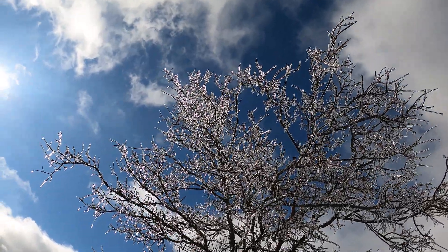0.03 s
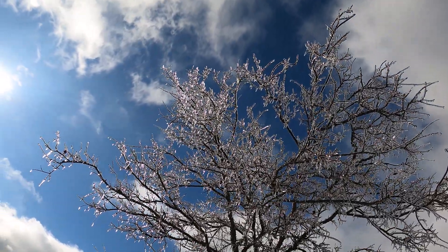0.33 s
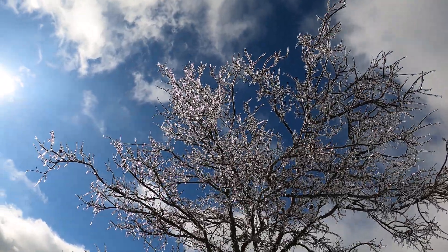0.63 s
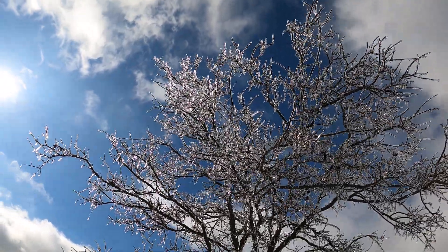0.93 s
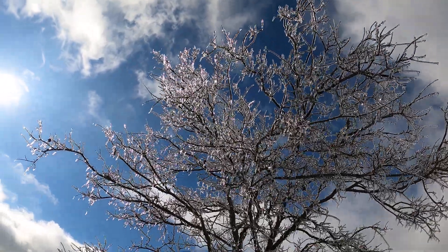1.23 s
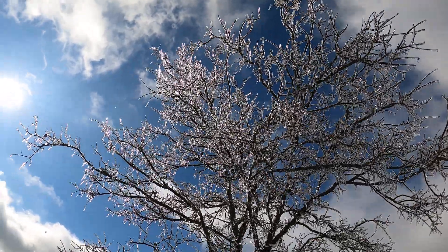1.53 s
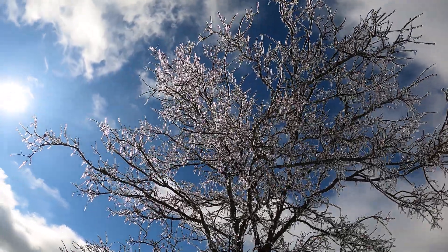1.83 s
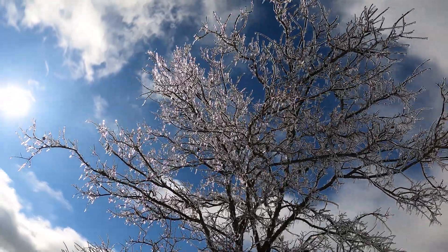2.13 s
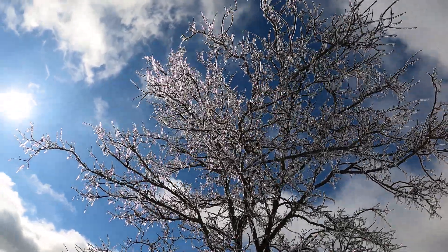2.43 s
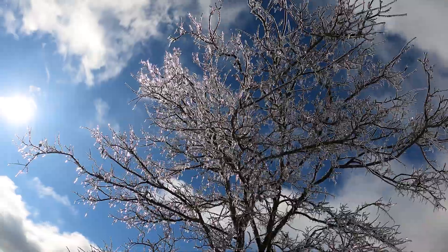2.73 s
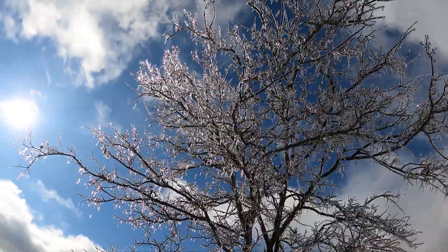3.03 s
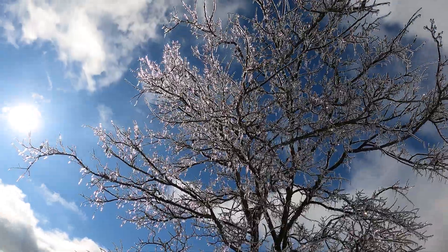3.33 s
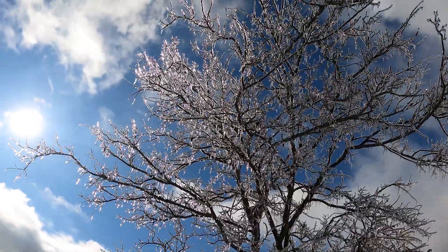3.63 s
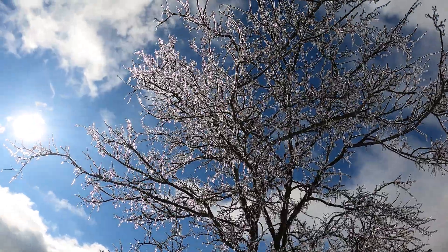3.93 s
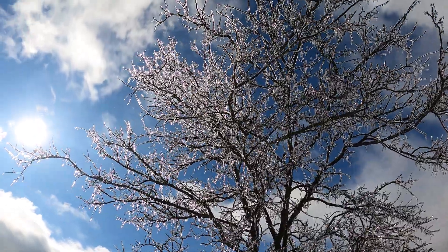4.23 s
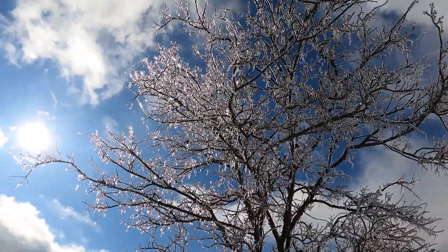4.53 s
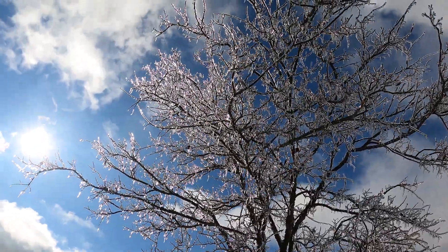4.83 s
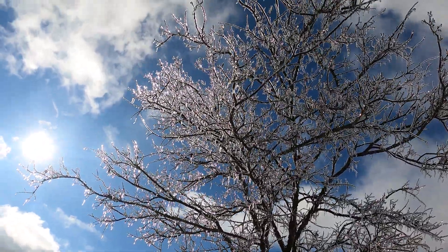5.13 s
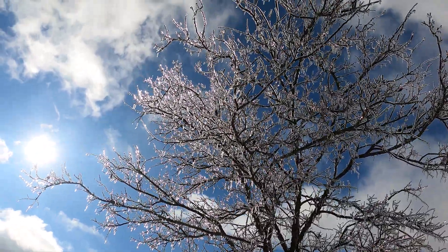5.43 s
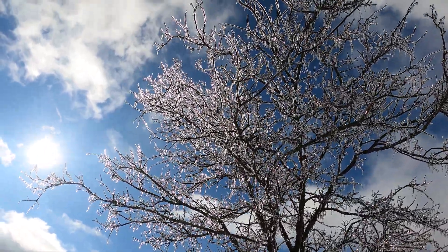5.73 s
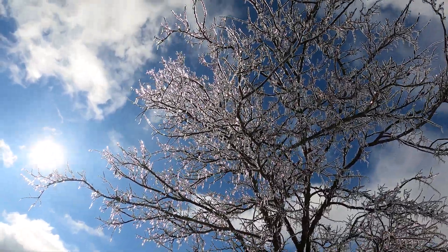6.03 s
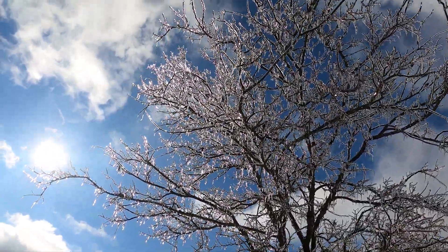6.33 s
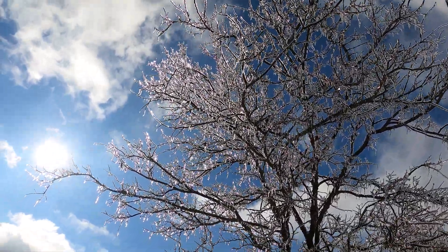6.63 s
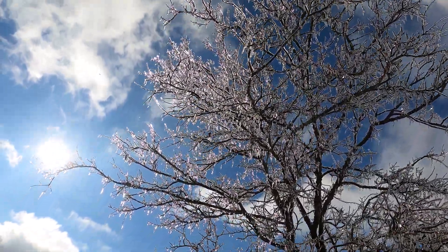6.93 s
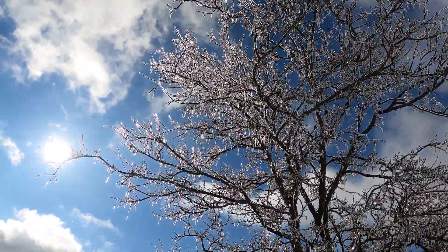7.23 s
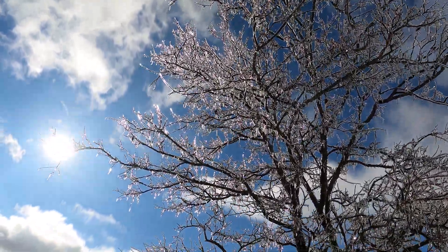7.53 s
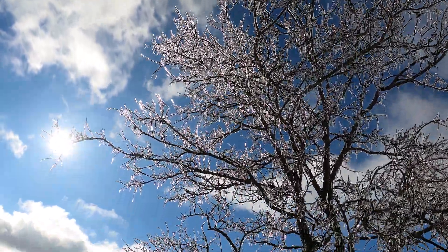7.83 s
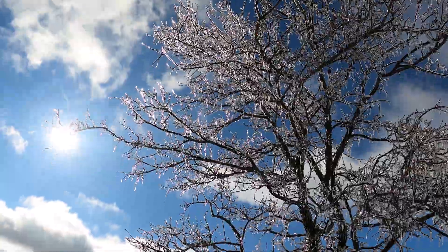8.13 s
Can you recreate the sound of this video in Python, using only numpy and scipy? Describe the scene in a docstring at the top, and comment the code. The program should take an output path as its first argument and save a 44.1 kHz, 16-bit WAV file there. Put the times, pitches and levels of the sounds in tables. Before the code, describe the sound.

A continuous highway rumble with tyre roar and hiss is heard outdoors beneath an ice-coated tree. Idling engines throb throughout with a fast, low pulse and light diesel clatter, alongside a faint, slowly fading hum and thin, wavering high whines. A car recedes during the first second, and the tyre noise swells slightly around 3.5 seconds. At about 5.9 seconds a deep truck exhaust booms in with a surge of road noise and stays until the end, while another car approaches, closest at about 8 seconds. Gusts faintly rustle and tinkle the icy twigs around 0.5 to 1.5, 2.5 to 4, 6 and 8 seconds. Small sharp ticks come between 0.5 and 2 seconds and near 6.5. Brief distant squeaks recur, mostly between 5.5 and 7 seconds. Wind softly buffets the microphone near 0.7, 2 and 4 seconds, and more often after 6.

```python
"""Highway under an icy tree

Tyres roar and hiss as one car leaves and another arrives; a heavy exhaust booms in at six seconds.
Two idling engines beat against each other over a diesel, with a hum, faint whines and far squeaks.
Gusts drive ice-coated twigs into contact, so that they rustle, tick and tinkle,
and eddies of wind softly buffet the microphone."""
import sys
import numpy as np
from scipy import signal
from scipy.fft import rfft, irfft, next_fast_len
from scipy.io import wavfile
from scipy.ndimage import uniform_filter1d, map_coordinates

SR = 44100
rng = np.random.default_rng(int(sys.argv[2]) if len(sys.argv) > 2 else 0)


def transcribe(u):
    """Save the signal u as a 16-bit wav file named by the first command-line argument.

    u: samples, shape (n,) or (channels, n), limited to [-1, 1]; the rate is SR.
    q: integer samples, one column per channel.
    """
    v = np.clip(np.atleast_2d(u).T, -1, 1)
    q = np.round(v * 32767).astype(np.int16)
    wavfile.write(sys.argv[1], SR, q)


N = 369538
TIME = np.arange(N) / SR
FFT_SIZE = next_fast_len(N, True)
BIN_HZ = np.maximum(np.arange(FFT_SIZE // 2 + 1) * SR / FFT_SIZE, 1)

# Spectra of the four parts of road noise: f/Hz, relative level/dB
RUMBLE_SPECTRUM = [(10, -26), (20, 0), (32, 0), (50, -1.5), (80, -1.5), (120, -3), (150, -6.5), (230, -23),
                   (500, -61)]
DRONE_SPECTRUM = [(90, -21), (150, -2), (200, -2), (255, -3.5), (290, -5.5), (360, -5), (450, -12.5),
                  (650, -23), (1500, -38)]
ROAR_SPECTRUM = [(250, -18), (420, -1), (530, -0.5), (800, 0), (1030, -2.5), (1300, -7.5), (1600, -12.5),
                 (2300, -23.5), (5000, -53)]
HISS_SPECTRUM = [(900, -27), (1500, -1), (1800, 1.5), (2150, 1.5), (2450, -3.5), (3150, -2), (4100, -9),
                 (4800, -15.5), (6500, -20), (9000, -26.5), (11500, -33), (15000, -60)]
# Cars at closest approach: t/s, distance/m, roar/dB, hiss/dB, tread note/dB
CARS = [(.1, 36.6, -32, -45.5, -43), (8.1, 28.6, -32.5, -43.5, -33.5)]
# Surges of road noise carried by the air: start/s, hold/s, fall/s, drone/dB, roar/dB, hiss/dB
SURGES = [(-.15, 0.18, 0.2, -32.5, -36.5, -46.5), (.6, 0.33, 1, -53, -42, -47.5),
          (3.342, 0.19, 0.5, -55, -39.5, -44.5), (4.45, 1.5, .5, -53, -48, -54.5),
          (5.926, 0.21, 0.2, -30.5, -31, -50), (6.21, 0.11, 0.25, -29, -33.5, -44.5),
          (8.08, 0.17, .2, -31, -32, -59)]
# Exhaust harmonics of each engine: multiple of the cycle rate, relative level/dB
SLOW_HARMONICS = [(3, -21), (4, -36), (5, -33.5), (7, -28), (9, -34.5), (10, -42), (12, -41), (16, -44.5)]
FAST_HARMONICS = [(2, -49), (3, -26), (4, -39), (7, -34), (10, -49), (14, -47), (15, -46)]
DIESEL_HARMONICS = [(17, -45), (18, -50), (23, -46.5), (29, -51.5), (35, -44), (37, -52.5), (38, -36),
                    (39, -49.5), (40, -49), (41, -49), (43, -44.5), (48, -52), (54, -51.5), (69, -56)]
# Spectrum of engine clatter: f/Hz, relative level/dB
CLATTER_SPECTRUM = [(100, 9), (170, 1.5), (260, 4.5), (430, -0.5), (800, -2), (1050, -1.5), (1400, -17.5),
                    (2500, -30)]
# Transmission of each engine through the air: t/s, gain/dB
SLOW_TRANSMISSION = [(0, -0.5), (.4, 1), (1.3, -5.5), (2.2, -3), (3, 0.5), (4.5, -1), (5.4, 1.5), (6.8, -9),
                     (8.38, 2)]
FAST_TRANSMISSION = [(0, 2), (.3, 4), (.8, -3), (1.5, 4), (3, 1.5), (4, 0), (5, -2), (6.1, 4), (8.38, -11)]
# Envelope of the slow engine's second firing note: t/s, level/dB
OVERTONE_ENVELOPE = [(0, -28), (1.1, -33), (1.8, -24), (2.8, -31.5), (4.2, -33), (5.4, -28), (6.4, -40),
                     (8.38, -29.5)]
# Partials of the machine hum: f/Hz, initial level/dB
HUM_PARTIALS = [(182.6, -46.5), (243.8, -45.5), (259.5, -46), (519, -43), (670, -48.5), (1015, -49),
                (3726, -61)]
# Envelopes of the two whines: t/s, relative level/dB
LOWER_WHINE_ENVELOPE = [(0, -57), (.6, -56), (1.2, -60.5), (2.2, -63), (2.7, -61), (3.2, -63), (3.7, -56),
                        (4.4, -65), (5.5, -68), (6.3, -60), (6.9, -57), (7.5, -55), (8.38, -53.5)]
UPPER_WHINE_ENVELOPE = [(0, -71), (.5, -63), (1.1, -62), (1.6, -64), (2, -72), (2.5, -66), (3.1, -70),
                        (3.6, -71), (4.2, -62.5), (5.6, -63.5), (6.25, -58), (6.6, -64.5), (7, -60.5),
                        (7.5, -67), (7.9, -60), (8.38, -69)]
# Spectra of the twigs' rustle and its finest sizzle: f/Hz, relative level/dB
RUSTLE_SPECTRUM = [(2000, -14), (4000, 6), (5600, 7.5), (7000, -4), (8000, 3.5), (9200, -18), (11000, -16),
                   (12500, -30), (15000, -30)]
SIZZLE_SPECTRUM = [(6000, -8), (8500, -6), (11000, -9), (12500, -13), (14000, -19), (15000, -22)]
# Sizzle between gusts: t/s, level/dB
CALM_SIZZLE = [(0, -64), (4.3, -66.5), (5.1, -67.5), (6.1, -64), (6.6, -82), (7.6, -81), (8.38, -69)]
# Gusts in the twigs: start/s, rise/s, hold/s, fall/s, rustle/dB, sizzle/dB
GUSTS = [(0.198, 0.48, 0.5, 0.18, -55, -61.5), (2.298, 0.49, 0.23, .35, -58.5, -64),
         (3.418, 0.05, .3, .56, -56, -85), (5.797, .35, 0.11, 0.39, -53.5, -73),
         (7.6, 0.35, 0.44, 0.2, -57, -61.5)]
# Single twig impacts: t/s, relative level/dB, f/Hz, 60 dB decay time/s
TWIG_IMPACTS = [(.507, -33, 4800, .035), (1.232, -35, 6760, 0.068), (1.432, -39, 6000, 0.043),
                (1.55, -43, 6000, .03), (2.048, -41, 5500, .025), (2.116, -37, 4200, 0.13),
                (4.934, -44, 7000, .03), (6.239, -34, 5000, 0.1), (6.304, -46, 5500, .04),
                (6.474, -35, 5000, 0.046), (6.546, -37, 5500, 0.043), (8.332, -39, 7500, .05)]
# Soft low booms, mostly eddies at the microphone; the one at 1.85 s swells under the slow engine's note: t/s,
# f/Hz, level/dB
LOW_BOOMS = [(.65, 74, -23), (1.85, 79, -27), (3.1, 177, -35.5), (3.98, 114, -25.5), (4.22, 50, -20),
             (6.2, 80, -29), (6.48, 180, -26), (6.85, 98, -28), (7.15, 97, -21.5), (7.48, 184, -24.5),
             (8.22, 178, -27)]
# Far squeaks: t/s, f/Hz, level/dB, half-length/s, stage bandwidth/Hz
SQUEAKS = [(1.668, 1785, -45, 0.068, 320), (2.367, 1710, -42, 0.03, 130), (3.21, 1800, -46, .05, 260),
           (5.598, 1800, -46, .04, 240), (5.97, 1870, -43.5, 0.057, 360), (6.348, 1860, -39.5, .035, 340),
           (6.99, 1920, -41, 0.055, 520)]
# Resonances of the truck's exhaust: f/Hz, stage bandwidth/Hz, relative level/dB
EXHAUST_RESONANCES = [(63.4, 58, 1.5), (101, 46, 1.5), (202.4, 42, -9.5)]


def undb(db):
    """Amplitude grows tenfold for every 20 dB."""
    return 10 ** (np.asarray(db) / 20)


def unit(x):
    """Normalisation to an rms of 1."""
    return x / np.sqrt(np.mean(x ** 2))


def envelope(table):
    """Gain by linear interpolation of level in time."""
    return undb(np.interp(TIME, *np.transpose(table)))


def swell(start, rise, hold, fall):
    """A trapezoidal envelope from 0 to 1 and back."""
    return np.interp(TIME, start + np.cumsum([0, rise, hold, fall]), [0, 1, 1, 0])


def power_sum(gains):
    """Incoherent sources add in power."""
    return np.sqrt(sum(g ** 2 for g in gains))


def wander(rate):
    """Low-pass filtered noise fluctuates smoothly, turning about `rate` times a second; rms 1."""
    spectrum = rfft(rng.standard_normal(FFT_SIZE)) / (1 + (2 * BIN_HZ / rate) ** 4)
    return unit(irfft(spectrum, FFT_SIZE)[:N])


def colour(x, spectrum):
    """Filtering multiplies the spectrum of x by a gain curve; rms 1."""
    hz, db = np.transpose(spectrum)
    gain = undb(np.interp(np.log(BIN_HZ), np.log(hz), db, left=-90, right=-90))
    return unit(irfft(rfft(x, FFT_SIZE) * gain, FFT_SIZE)[:N])


def resonate(x, hz, width_hz):
    """Two equal resonators in cascade select a steep-sided band; rms 1."""
    b, a = signal.iirpeak(hz, hz / width_hz, fs=SR)
    return unit(signal.lfilter(b, a, signal.lfilter(b, a, x)))


def wash(spectrum, waver_db, waver_rate):
    """Refraction in moving air makes the noise of many far vehicles waver."""
    return colour(rng.standard_normal(N), spectrum) * undb(waver_db * wander(waver_rate))


def distance(nearest_s, nearest_m, speed_m_s=24.5):
    """Range in metres of a car in uniform straight motion."""
    return np.hypot(nearest_m, speed_m_s * (TIME - nearest_s))


def traffic_gains(hiss_loss_db_per_m=3, surge_rise_s=0.15):
    """Far stream, truck, cars and surges add in power; the cars fade by spherical spreading."""
    rumble, drone, roar, hiss = [undb(-28.5)], [undb(-36)], [undb(-38)], [undb(-46.5)]  # far stream
    for part, truck_db in (rumble, -25.5), (roar, -43), (hiss, -43):
        part.append(undb(truck_db) * truck_presence())
    for s, nearest_m, roar_db, hiss_db, _ in CARS:
        r = distance(s, nearest_m)
        roar.append(undb(roar_db) * nearest_m / r)
        hiss.append(undb(hiss_db - hiss_loss_db_per_m * (r - nearest_m)) * nearest_m / r)
    for s, hold, fall, drone_db, roar_db, hiss_db in SURGES:
        surge = swell(s, surge_rise_s, hold, fall)
        drone.append(undb(drone_db) * surge)
        roar.append(undb(roar_db) * surge)
        hiss.append(undb(hiss_db) * surge)
    return power_sum(rumble), power_sum(drone), power_sum(roar), power_sum(hiss)


def highway(rumble, drone, roar, hiss):
    """Superposition of broadband noise: exhausts rumble, bodies drone, treads roar and hiss."""
    return (rumble * wash(RUMBLE_SPECTRUM, waver_db=-0.2, waver_rate=3.9)
            + drone * wash(DRONE_SPECTRUM, waver_db=0.3, waver_rate=4.0)
            + roar * wash(ROAR_SPECTRUM, waver_db=0.18, waver_rate=31)
            + hiss * wash(HISS_SPECTRUM, waver_db=0.6, waver_rate=14))


def tread_note(hz=960, width_hz=480):
    """Horn effect: air pumped from a near car's treads sings in the gap between tyre and road."""
    gain = power_sum(undb(db) * (metres / distance(s, metres)) ** 2 for s, metres, _, _, db in CARS)
    return resonate(rng.standard_normal(N), hz, width_hz) * gain


def idle(cycle_hz, harmonics, clatter_db, hunt, uneven_db):
    """Periodic firing gives exhaust harmonics and a repeating clatter; the speed hunts slightly."""
    cycles = np.cumsum(cycle_hz * (1 + hunt * wander(2.0))) / SR
    swells = [undb(uneven_db * wander(3.9)) for _ in range(3)]
    notes = sum(undb(db) * swells[i % 3] * np.sin(2 * np.pi * (round(order) * cycles + rng.random()))
                for i, (order, db) in enumerate(harmonics))
    pattern = rng.standard_normal(2048)
    clatter = map_coordinates(pattern, [cycles % 1 * len(pattern)], order=1, mode="grid-wrap")
    return notes + undb(clatter_db) * colour(clatter, CLATTER_SPECTRUM)


def engines(slow_hz=15.0, fast_hz=18.81, diesel_hz=8.748, diesel_fade_db_per_s=0.4):
    """Two engines' third harmonics beat at their difference, about 11 Hz, while a diesel churns."""
    slow = idle(slow_hz, SLOW_HARMONICS, clatter_db=-45, hunt=0.00092, uneven_db=1.0)
    fast = idle(fast_hz, FAST_HARMONICS, clatter_db=-45, hunt=0.00078, uneven_db=0.9)
    diesel = idle(diesel_hz, DIESEL_HARMONICS, clatter_db=-40.5, hunt=0.0008, uneven_db=0.5)
    cycles = np.cumsum(slow_hz * (1 + 0.00084 * wander(3.0))) / SR
    overtone = np.sin(2 * np.pi * 6 * cycles)  # the slow engine's second firing note
    return (slow * envelope(SLOW_TRANSMISSION) + overtone * envelope(OVERTONE_ENVELOPE)
            + fast * envelope(FAST_TRANSMISSION) + diesel * undb(-diesel_fade_db_per_s * TIME))


def hum(drift=0.0009, fade_db_per_s=0.8):
    """Common frequency modulation: a machine's partials drift together as they slowly fade."""
    clock = np.cumsum(1 + drift * wander(2.65)) / SR
    return sum(undb(db - fade_db_per_s * TIME) * np.sin(2 * np.pi * hz * clock)
               for hz, db in HUM_PARTIALS)


def held_tone(hz=4388, drift_hz=9, tremble_hz=9, fade_db=2.0):
    """Random frequency and amplitude modulation make one tone tremble and fade in and out."""
    phase = 2 * np.pi * np.cumsum(hz + drift_hz * wander(4.92) + tremble_hz * wander(60)) / SR
    return unit(np.sin(phase) * undb(fade_db * wander(11)))


def whine_band(hz, width_hz, warble_hz, flicker_db):
    """Quadrature modulation by noise spreads a warbling tone into a narrow, flickering band."""
    phase = 2 * np.pi * np.cumsum(hz + warble_hz * wander(40.26)) / SR
    band = wander(width_hz) * np.cos(phase) + wander(width_hz) * np.sin(phase)
    return unit(band * undb(flicker_db * wander(17)))


def twitter(bursts=42, chirps=8, hz=9900, burst_scatter_hz=95, scatter_hz=150, glide_hz_per_s=4000,
            half_s=0.012, stagger_s=0.026, burst_s=0.086, spread_db=1.3):
    """Linear chirps under Gaussian envelopes cluster in about five bursts a second."""
    out = np.zeros(N)
    age = TIME[:SR // 10] - TIME[SR // 20]
    window = np.exp(-(age / half_s) ** 2)
    burst_times = np.linspace(0, TIME[-1], bursts)
    for s, (late, centre, strength) in zip(burst_times, rng.standard_normal((bursts, 3))):
        for when, (pitch, glide) in zip(np.linspace(-.5, .5, chirps), rng.standard_normal((chirps, 2))):
            start = int(np.clip((s + stagger_s * late + burst_s * when) * SR, 0, N - len(age)))
            chirp_hz = hz + burst_scatter_hz * centre + scatter_hz * pitch
            phase = 2 * np.pi * (chirp_hz * age + glide_hz_per_s * glide * age ** 2 / 2)
            out[start:start + len(age)] += undb(spread_db * strength) * np.sin(phase) * window
    return unit(out)


def whines():
    """A tone in a breathy band, a twitter blurred by scattering, and a faint band on top."""
    lower = undb(-4.5) * held_tone()
    lower += undb(-2.5) * whine_band(hz=4420, width_hz=210, warble_hz=24.9, flicker_db=0.6)
    chirps = twitter()
    bursts = unit(uniform_filter1d(np.abs(chirps), size=SR // 16))
    scattered = bursts * whine_band(hz=9970, width_hz=580, warble_hz=49.6, flicker_db=1.5)
    top = whine_band(hz=14000, width_hz=550, warble_hz=60, flicker_db=4)
    upper = undb(-3.5) * chirps + undb(-3) * scattered + undb(-24) * top
    return lower * envelope(LOWER_WHINE_ENVELOPE) + upper * envelope(UPPER_WHINE_ENVELOPE)


def rustle(contacts_per_s=7000, calm_db=-63.5, spread_db=3.5, flutter_db=0.9):
    """Shot noise: countless contacts of icy twigs merge over a hiss of air, and gusts stir both."""
    stir, sizzle = [undb(calm_db)], [envelope(CALM_SIZZLE)]
    for s, rise, hold, fall, rustle_db, sizzle_db in GUSTS:
        gust = swell(s, rise, hold, fall)
        stir.append(undb(rustle_db) * gust)
        sizzle.append(undb(sizzle_db) * gust)
    contacts = (rng.random(N) < contacts_per_s / SR) * rng.standard_normal(N)
    contacts *= undb(spread_db * np.minimum(rng.exponential(size=N), 6))  # a few are much larger
    air = rng.standard_normal(N)
    coarse = colour(unit(contacts) + air, RUSTLE_SPECTRUM) * power_sum(stir)
    fine = colour(rng.standard_normal(N), SIZZLE_SPECTRUM) * power_sum(sizzle)
    return (coarse + fine) * undb(flutter_db * wander(24))


def tinkles(per_gust=24, peak_db=-51.0, spread_db=1.0, low_hz=4300, high_hz=7800, t60=0.027):
    """Damped free vibration: each bit of ice rings at its own pitch, louder in a stronger gust."""
    out = np.zeros(N)
    age = TIME[:SR // 20]
    decay = np.exp(-np.log(1000) * age / t60)
    strongest_db = max(gust[4] for gust in GUSTS)
    for s, rise, hold, fall, rustle_db, _ in GUSTS:
        for when, pitch, size in rng.random((per_gust, 3)):
            start = int((s + rise / 2 + when * (rise / 2 + hold + fall / 2)) * SR) % N
            hz = low_hz + pitch * (high_hz - low_hz)
            db = peak_db + rustle_db - strongest_db + spread_db * np.log(size)
            ring = np.sin(2 * np.pi * hz * age) * decay
            out[start:start + len(age)] += undb(db) * ring[:N - start]
    return out


def ticks(width_hz=3200, gain_db=-8, attack_s=0.0013):
    """Impact excitation: a twig knocks its neighbour, and the crackle decays exponentially."""
    out = np.zeros(N)
    age = TIME[:SR // 5]
    for s, db, hz, t60 in TWIG_IMPACTS:
        crackle = resonate(rng.standard_normal(len(age)), hz, width_hz)
        crackle *= np.minimum(age / attack_s, 1) * np.exp(-np.log(1000) * age / t60)
        start = int(s * SR)
        out[start:start + len(age)] += undb(db + gain_db) * crackle[:N - start]
    return out


def noise_pulse(s, hz, db, half_s, width_hz):
    """Band-limited noise swells and fades under a Gaussian envelope."""
    window = np.exp(-((TIME - s) / half_s) ** 2)
    return resonate(rng.standard_normal(N), hz, width_hz) * undb(db) * window


def buffets(half_s=0.12, relative_width=0.56):
    """Turbulent pressure: eddies at the microphone make soft, low booms, and one low swell thickens the slow
    engine's note."""
    return sum(noise_pulse(s, hz, db, half_s, relative_width * hz) for s, hz, db in LOW_BOOMS)


def squeaks():
    """Multipath propagation blurs each far squeal into a narrow band of noise."""
    return sum(noise_pulse(*row) for row in SQUEAKS)


def truck_presence(start_s=5.9, rise_s=0.18):
    """A linear ramp from 0 to 1 brings the truck into earshot."""
    return np.clip((TIME - start_s) / rise_s, 0, 1)


def truck_exhaust(level_db=-23, waver_db=-1.0, waver_rate=5):
    """Forced resonance: uneven gas flow makes the exhaust boom in three broad bands."""
    flow = rng.standard_normal(N)
    boom = sum(undb(db) * resonate(np.roll(flow, k * SR), hz, width_hz)  # shifts decorrelate the bands
               for k, (hz, width_hz, db) in enumerate(EXHAUST_RESONANCES))
    return unit(boom) * truck_presence() * undb(level_db + waver_db * wander(waver_rate))


def scene():
    """Superposition: the pressures of all sources add at one microphone."""
    road = highway(*traffic_gains()) + truck_exhaust() + tread_note()
    machines = engines() + hum() + whines() + squeaks()
    return (road + machines + rustle() + tinkles() + ticks() + buffets())[None]


def record(dry, ceiling=0.45, cutoff_hz=14700):
    """Soft saturation rounds the largest swings, and a low-pass filter cuts the top."""
    lowpass = signal.ellip(8, .2, 70, cutoff_hz, fs=SR, output="sos")
    return signal.sosfilt(lowpass, ceiling * np.tanh(dry / ceiling))


dry = scene()
out = record(dry)
transcribe(out)
```